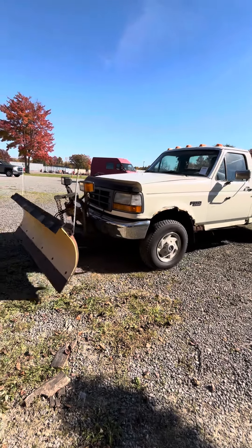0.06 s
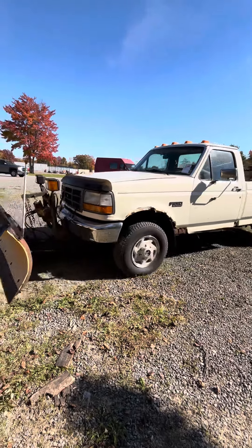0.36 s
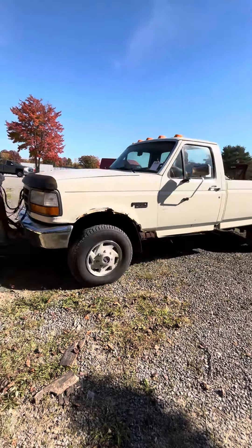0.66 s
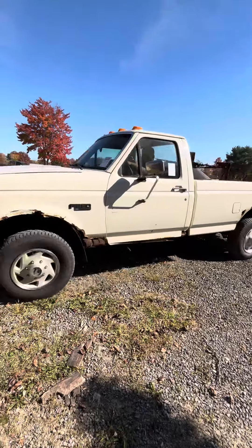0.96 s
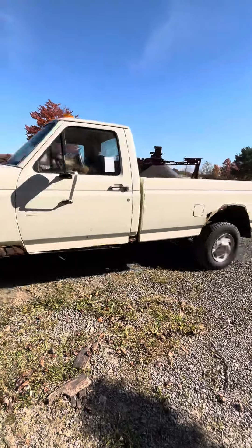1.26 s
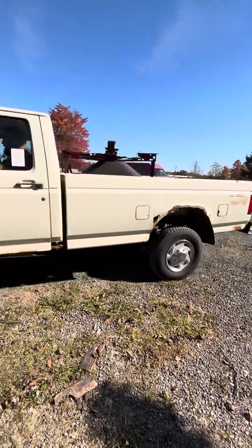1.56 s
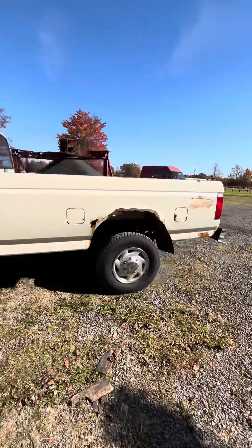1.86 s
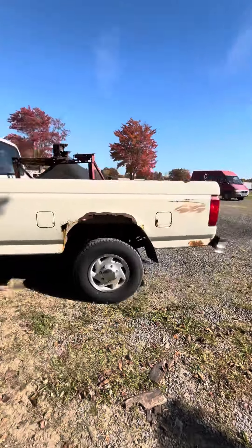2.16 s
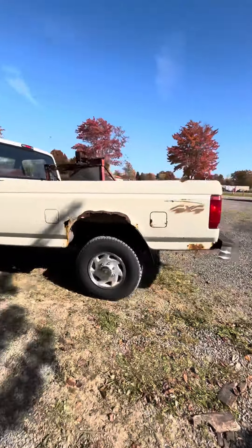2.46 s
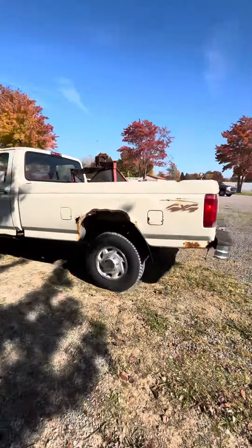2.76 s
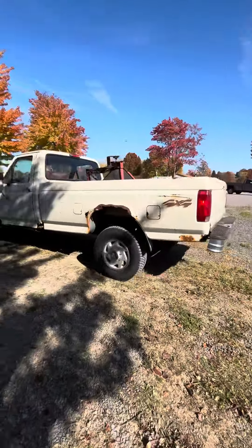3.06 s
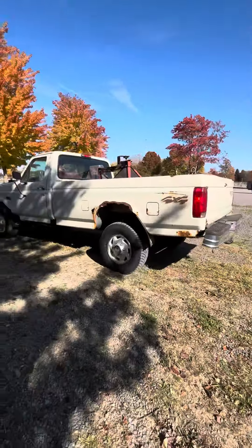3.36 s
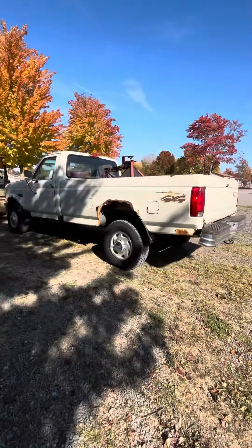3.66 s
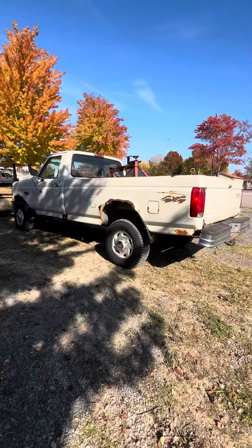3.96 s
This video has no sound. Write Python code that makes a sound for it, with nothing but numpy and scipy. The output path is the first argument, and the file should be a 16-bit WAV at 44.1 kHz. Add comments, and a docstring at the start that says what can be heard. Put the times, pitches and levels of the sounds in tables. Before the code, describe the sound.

A pickup engine revs briefly, booming with metallic clatter, then drops to a rough, burbling idle with a regular sharp tick and light rattles. It is heard outdoors on a phone carried from nose to tail.

```python
"""Outdoors, a V8 pickup is briefly revved and sinks back to idle, heard by a phone carried from nose to tail.
Each cylinder bank fires unevenly, so the pulses hold harmonics of the engine cycle: they boom under
throttle, while impacts and gritty bursts ring the metal of the engine bay. Once the throttle shuts,
the exhaust burbles, gas slugs chug at the tailpipe's resonances, and a sharp puff, like a leaking
manifold, ticks once in every cycle. Fan and belts whirr behind it, and loose parts rattle."""
import sys
import numpy as np
from scipy import signal
from scipy.fft import rfft, irfft
from scipy.io import wavfile

SR = 44100
rng = np.random.default_rng(int(sys.argv[2]) if len(sys.argv) > 2 else 0)


def transcribe(u):
    """Save the signal u as a 16-bit wav file named by the first command-line argument.

    u: samples, shape (n,) or (channels, n), limited to [-1, 1]; the rate is SR.
    q: integer samples, one column per channel.
    """
    v = np.clip(np.atleast_2d(u).T, -1, 1)
    q = np.round(v * 32767).astype(np.int16)
    wavfile.write(sys.argv[1], SR, q)


N = 176400
PADDED = 180000  # FFT length [samples]
CYCLE_TURNS, CYLINDERS = 2, 8  # crank turns and firings in one engine cycle

# levels of the rough layers (time [s], rumble [dB], clatter [dB], leak [dB], whirr [dB])
ROUGH_LEVELS = [(0, -22.5, -29, -60, -25), (.45, -20.5, -26.5, -62, -22), (.9, -18.5, -30, -49, -24.5),
                (1.08, -23, -45, -62, -26.5), (1.3, -24, -66, -53, -33), (1.7, -30, -53, -58, -33),
                (2.3, -28, -54.5, -56, -35.5), (2.9, -32.5, -50.5, -50, -38), (3.5, -35, -53.5, -46, -40.5),
                (4, -33, -60, -51.5, -41.5)]
# modes of the engine's metal parts (frequency [Hz], bandwidth [Hz], relative level [dB])
METAL_MODES = [(635, 66, 9), (871, 13, 3), (1947, 15.3, 3), (2150, 87, 0.5), (2628, 60, 6),
               (3028, 14, -1.5), (3190, 91, 0.5), (3660, 28, -1.5), (4240, 57, -4), (5047, 27, 0)]


def boom(cycle):
    """Periodic excitation: under throttle, uneven firing pulses sound harmonics of the cycle rate."""
    # spectrum (order [multiple of the cycle rate], relative level [dB])
    orders = [(2, -37.5), (3, -37), (4, -34.5), (5, -11.5), (6, -45), (7, -33.5), (8, -12.5), (9, -25.5),
              (10, -42), (11, -23), (12, -38), (13, -27.5), (16, -19.5), (17, -37), (19, -31), (21, -40),
              (22, -30), (23, -39), (24, -33.5), (29, -32.5)]
    # envelope (time [s], gain [dB])
    gain = [(0, 1), (.3, 0.5), (.65, 2), (.9, 1.5), (1.02, -2.5), (1.15, -3.5), (1.27, -10), (1.5, -67),
            (4, -71)]
    return -harmonics(cycle, orders, waver=0.021) * undb(curve(gain))


def burble(cycle):
    """Random modulation: with the throttle shut, wavering harmonics surround the firing note."""
    # spectrum without the firing note (order [multiple of the cycle rate], relative level [dB])
    orders = [(5, -42.5), (7, -37), (9, -31.5), (11, -29.5), (13, -31.5), (18, -42.5), (19, -33.5),
              (21, -42), (23, -42), (24, -37), (27, -41), (29, -38.5), (32, -39.5), (35, -43), (38, -44),
              (40, -45.5)]
    # envelopes (time [s], burble gain [dB], firing note level [dB])
    levels = [(0, -33, -41), (1, -7, -38), (1.28, 0.5, -27), (1.5, 3, -24.5), (2, -0.5, -22.5),
              (2.6, -0.5, -30.5), (3.1, 0.5, -35), (3.6, -1, -54), (4, -5.5, -58)]
    lumps = harmonics(cycle, orders, waver=0.09, smear_rad=.95) * undb(curve(levels))
    note = harmonics(cycle, [(CYLINDERS, 0)], waver=0.083) * undb(curve(levels, column=2))
    return lumps + note


def rumble(cycle):
    """Flow noise: rough exhaust gas swells at each firing and excites the tailpipe's hollow resonance."""
    # gas spectrum (frequency [Hz], relative density [dB])
    spectrum = [(20, -41), (45, -7), (75, -3), (150, 0.5), (220, -6.5), (310, -7), (450, -16.5), (700, -32),
                (2000, -59)]
    # envelope of the resonance (time [s], level [dB])
    pipe_level = [(0, -31), (.5, -28.5), (.65, -29.5), (.77, -24.5), (1, -37), (1.4, -34.5), (2.2, -37),
                  (3, -53), (3.6, -51), (4, -46)]
    pipe_hz, width_hz = 279.4, 84
    gas = colour(noise() * throb(cycle, depth=0.55), spectrum)
    flow = noise() * throb(cycle, depth=0.46)
    hollow = unit(ring(ring(flow, pipe_hz, width_hz), pipe_hz, width_hz))
    return gas * undb(curve(ROUGH_LEVELS)) + hollow * undb(curve(pipe_level))


def drone(cycle):
    """The second harmonic of the firing rate: a smooth tone an octave above the firing note."""
    # envelope (time [s], level [dB])
    level = [(0, -45), (1.1, -28.5), (1.3, -23.5), (1.55, -21), (1.8, -23), (2.1, -24.5), (2.6, -24.5),
             (3.1, -25), (3.6, -25), (4, -28.5)]
    return harmonics(cycle, [(2 * CYLINDERS, 0)], waver=0.046) * undb(curve(level))


def chugs(cycle):
    """Impulse response of a pipe: slugs of gas ring the tailpipe's modes in rounded chugs."""
    # gas slugs, in two groups a cycle (place [cycles], relative level [dB])
    slugs = [(.13, -11), (0.299, -7), (.36, -1), (.66, -1.5), (0.761, 1.5)]
    # pipe modes (frequency [Hz], bandwidth [Hz], relative level [dB])
    modes = [(204, 50, 0.5), (275.3, 42, 0.5)]
    # envelope (time [s], level [dB])
    level = [(0, -51), (1.1, -31), (1.5, -36), (2.6, -32), (3.2, -34), (3.65, -33.5), (4, -36)]
    push = pulses(cycle, slugs, scatter_db=0.5)
    pipe = sum(undb(db) * ring(ring(push, hz, width), hz, hz / 2) for hz, width, db in modes)
    return unit(pipe) * undb(curve(level))


def clatter(cycle):
    """Forced vibration: gritty noise bursts in the engine bay drive the modes of its metal parts."""
    # bursts in each cycle (place [cycles], relative level [dB], decay [cycles])
    pattern = [(.09, 1.5, 0.32), (.335, -3, 0.72), (.485, 0.5, 0.12), (.745, -4.5, 0.13)]
    # burst spectrum (frequency [Hz], relative density [dB])
    spectrum = [(150, -4), (400, -8), (800, -3.5), (1500, 0.5), (2500, -0.5), (4300, -6), (5800, -5.5),
                (8000, -10), (10500, -23), (14000, -19), (16000, -33)]
    grit_per_s, grit_db, metal_db = 2500, -6.5, -18
    grit = unit(np.sign(noise()) * (rng.random(N) < grit_per_s / SR))
    drive = (noise(channels=3) + undb(grit_db) * grit) * bursts(cycle, pattern, rise_cycles=0.054)
    metal = unit(sum(undb(db) * ring(drive, hz, width) for hz, width, db in METAL_MODES))
    return unit(colour(drive, spectrum) + undb(metal_db) * metal) * undb(curve(ROUGH_LEVELS, column=2))


def valve_taps(cycle):
    """Free vibration after impact: each valve gear blow cracks and rings its own mix of metal modes."""
    # blows in each cycle (place [cycles], relative level [dB])
    pattern = [(.1, -1), (.14, 2.5), (.23, -2.5), (.355, -1.5), (.43, 2), (.51, -0.5), (.58, -3),
               (0.759, -6)]
    # tone shaping (frequency [Hz], relative gain [dB])
    spectrum = [(200, -3), (600, 0), (2000, -1.5), (3200, 2), (4500, 4.5), (8000, 4), (10500, -9.5),
                (14000, -6), (16000, -20)]
    # envelope (time [s], level [dB])
    level = [(0, -29), (.45, -24.5), (.9, -29.5), (1.08, -44), (1.3, -49.5), (1.75, -46.5), (2.3, -54),
             (4, -58)]
    mode_scatter_db, detune_share, crack_db, crack_decay_s = 8.5, .012, 0.5, 0.0044
    blows = pulses(cycle, pattern, scatter_db=3.5)
    age = np.arange(SR // 16) / SR
    hz, width, db = np.array(METAL_MODES).T[:, :, None]
    decay = np.sqrt(width / width.sum()) * np.exp(-np.pi * width * age)  # broad modes die sooner
    out = np.zeros((3, N + len(age)))
    for at in np.flatnonzero(blows):
        size, detune, phase = rng.standard_normal(size=(3, 3, len(METAL_MODES), 1))
        strength = undb(db + mode_scatter_db * np.clip(size, -1, 1))
        pitch = hz * (1 + detune_share * detune)
        rings = (strength * decay * np.sin(2 * np.pi * (pitch * age + phase))).sum(axis=1)
        crack = undb(crack_db) * rng.standard_normal(size=(3, len(age))) * np.exp(-age / crack_decay_s)
        out[:, at:at + len(age)] += blows[at] * (rings + crack)
    return colour(out, spectrum) * undb(curve(level))


def clacks():
    """Damped resonance: shaken parts in the engine bay clack, each with its own short ring."""
    # metallic clacks (time [s], pitch [Hz], level [dB])
    hits = [(0.032, 1210, -18), (0.185, 1720, -17.5), (.213, 2180, -22.5), (0.262, 3060, -22),
            (.274, 4740, -31), (.438, 4170, -16), (.449, 4770, -31), (0.602, 2170, -17),
            (0.774, 4530, -21.5), (0.87, 2100, -21), (0.899, 4400, -23), (0.947, 1650, -22.5),
            (1.03, 4500, -39)]
    return sum(undb(db) * strike(s, decay_s=0.013) * unit(ring(noise(), hz, width_hz=280))
               for s, hz, db in hits)


def leak(cycle):
    """Jet noise: escaping gas puffs weakly throughout and, towards idle, ticks sharply once a cycle."""
    # weak puffs in each cycle (place [cycles], relative level [dB], decay [cycles])
    puffs = [(.18, -1, .092), (.58, -3, .14), (.85, -4, .05)]
    # their spectrum (frequency [Hz], relative density [dB])
    puff_spectrum = [(200, -20), (600, -1.5), (1200, 17), (2000, 10.5), (3000, 6.5), (4300, -5),
                     (5800, -7.5), (8000, -24), (10500, -42), (15000, -29)]
    # sharp ticks (time [s], hiss level [dB], clack level [dB], clack pitch [Hz])
    ticks = [(1.348, -40, -35, 2000), (1.457, -44, -40, 2080), (1.568, -39.5, -32.5, 1680),
             (1.684, -36.5, -44, 3000), (1.798, -37.5, -36, 1900), (1.913, -44, -36, 1800),
             (2.031, -39, -36, 1500), (2.149, -40, -35, 1900), (2.268, -37, -31, 1200),
             (2.388, -35.5, -39, 1500), (2.511, -36, -33, 1280), (2.639, -36.5, -51, 1200),
             (2.765, -39.5, -36, 1400), (2.896, -39.5, -30.5, 1700), (3.031, -38.5, -39, 1510),
             (3.165, -43.5, -38, 2120), (3.299, -39, -33.5, 2020), (3.433, -41, -34.5, 1730),
             (3.57, -39.5, -32, 1860), (3.709, -43, -37.5, 1110), (3.847, -43.5, -35.5, 2200),
             (3.987, -47, -36.5, 1900)]
    # spectrum of their hiss (frequency [Hz], relative density [dB])
    hiss_spectrum = [(500, -14), (2000, -1), (3000, -0.5), (4300, 1.5), (5800, 4), (8000, -2),
                     (10500, -18.5), (15000, -13.5)]
    rise_s, decay_s, width_hz = 0.0022, 0.012, 1160
    t = np.arange(N) / SR
    gas = noise(channels=3)
    hiss = colour(noise(channels=3), hiss_spectrum)
    puffing = noise(channels=3) * bursts(cycle, puffs, rise_cycles=0.022)
    out = colour(puffing, puff_spectrum) * undb(curve(ROUGH_LEVELS, column=3))
    for s, hiss_db, clack_db, hz in ticks:
        near = slice(int(s * SR), int(s * SR) + SR // 10)
        shape = swell(np.maximum(t[near] - s, 0), rise_s, decay_s)
        clack = unit(ring(ring(gas[:, near], hz, width_hz), hz, 2 * width_hz))
        out[:, near] += shape * (undb(hiss_db) * hiss[:, near] + undb(clack_db) * clack)
    return out


def whirr(cycle):
    """Broadband noise of fan, belts and valve gear, fluttering and pulsing faintly with the firings."""
    # spectrum (frequency [Hz], relative density [dB])
    spectrum = [(100, -8), (350, -0.5), (550, 1), (900, -1.5), (1600, -8), (2500, -13.5), (4300, -21.5),
                (5800, -23.5), (8000, -28), (10500, -39), (15000, -35.5)]
    drive = noise(channels=3) * throb(cycle, depth=0.033) * undb(1.06 * drift(knots_per_s=90))
    return colour(drive, spectrum) * undb(curve(ROUGH_LEVELS, column=4))


def rasp(cycle, hz=4440, width_hz=1130):
    """Band-limited noise, modulated at the firing rate: a thin bright rasp beside the valve taps."""
    # envelope (time [s], level [dB])
    level = [(0, -41), (.45, -43), (.9, -34), (1.08, -43.5), (1.3, -54), (1.75, -53.5), (2.3, -63),
             (4, -67)]
    drive = noise(channels=3) * throb(cycle, depth=0.23)
    return unit(ring(ring(drive, hz, width_hz), hz, width_hz)) * undb(curve(level))


def knocks():
    """Heavy damping: three modes die within milliseconds, so each knock sounds dull."""
    # knocks (time [s], level [dB])
    hits = [(1.671, -15), (2.512, -40), (2.897, -29.5), (3.573, -28)]
    # their modes (frequency [Hz], relative level [dB])
    modes = [(660, 1.5), (830, -8.5), (1040, -5)]
    t = np.arange(N) / SR
    return sum(undb(db + mode_db) * strike(s, decay_s=.003) * np.sin(2 * np.pi * hz * (t - s))
               for s, db in hits for hz, mode_db in modes)


def rattles():
    """Light impacts: loose parts each give a fast-decaying band of noise."""
    # rattles (time [s], pitch [Hz], bandwidth [Hz], level [dB])
    hits = [(1.96, 2130, 303, -44), (2.044, 1080, 597, -32), (2.346, 2150, 200, -31),
            (2.466, 2110, 200, -38.5), (2.59, 2130, 199, -35), (2.639, 2150, 200, -30.5),
            (2.72, 2100, 198, -35), (2.881, 1700, 2000, -35), (2.98, 1400, 594, -38),
            (3.113, 1780, 3470, -36), (3.386, 2300, 600, -38), (3.52, 2100, 500, -35),
            (3.659, 2060, 500, -34), (3.799, 1930, 496, -38), (3.938, 2400, 900, -42)]
    return sum(undb(db) * strike(s, decay_s=0.0042) * unit(ring(noise(), hz, width))
               for s, hz, width, db in hits)


def harmonics(cycle, orders, waver, smear_rad=.45):
    """Fourier series of one bank's uneven pulses; pipes smear the phases and high orders waver more."""
    # firings of the nearer cylinder bank (slot [eighths of a cycle])
    bank_slots = [0, 2, 3, 5]
    out = 0
    for order, db in orders:
        bank = np.exp(-2j * np.pi * order * np.array(bank_slots) / CYLINDERS).sum()
        phase = 2 * np.pi * order * cycle + np.angle(bank) + smear_rad * rng.standard_normal()
        spread = waver * order / CYLINDERS
        amplitude = undb(db) * (1 + spread * drift(knots_per_s=12))
        out = out + amplitude * np.cos(phase + spread * drift(knots_per_s=12))
    return out


def bursts(cycle, table, rise_cycles):
    """Envelope of bursts that return in every cycle, vary a little in strength and add in power."""
    power = 0
    for place, db, decay in table:
        since = cycle - place + 1
        size = undb(db - 0.5 * rng.standard_normal(size=64))[since.astype(int)]
        power = power + (size * swell(since % 1, rise_cycles, decay)) ** 2
    return unit(np.sqrt(power))


def pulses(cycle, table, scatter_db):
    """Impulse train: pushes at set places of every cycle, each of its own strength."""
    out = np.zeros(N)
    for place, db in table:
        at = np.flatnonzero(np.diff(np.floor(cycle - place)))
        out[at] += undb(db + scatter_db * rng.standard_normal(size=64))[:len(at)]
    return out


def throb(cycle, depth):
    """Amplitude modulation at the firing rate."""
    return unit(1 + depth * np.cos(2 * np.pi * CYLINDERS * cycle))


def swell(age, rise, decay):
    """Linear rise, then exponential decay."""
    return np.minimum(age / rise, 1) * np.exp(-np.maximum(age - rise, 0) / decay)


def strike(start_s, decay_s):
    """Sudden onset, then exponential decay."""
    age = np.arange(N) / SR - start_s
    return (age >= 0) * np.exp(-np.maximum(age, 0) / decay_s)


def ring(x, hz, width_hz):
    """Second-order resonator."""
    return signal.lfilter(*signal.iirpeak(hz, hz / width_hz, fs=SR), x)


def colour(x, table):
    """Spectral shaping, scaled to rms 1."""
    return unit(irfft(rfft(x, PADDED) * undb(response(table)), PADDED)[..., :N])


def noise(channels=1):
    """White noise, uncorrelated between rows."""
    return rng.standard_normal((channels, N))


def drift(knots_per_s):
    """Random fluctuation: Gaussian values joined by straight lines."""
    knots = rng.standard_normal(1024)
    return 1.67 * np.interp(np.arange(N) / SR * knots_per_s, np.arange(len(knots)), knots)


def curve(table, column=1):
    """One column of a time table, interpolated linearly."""
    rows = np.array(table, float)
    return np.interp(np.arange(N) / SR, rows[:, 0], rows[:, column])


def response(table, column=1):
    """One column of a frequency table, interpolated over log frequency."""
    rows = np.array(table, float)
    hz = np.maximum(np.fft.rfftfreq(PADDED, 1 / SR), 1)
    return np.interp(np.log(hz), np.log(rows[:, 0]), rows[:, column])


def undb(db):
    """Decibels to amplitude ratio."""
    return 10 ** (np.asarray(db) / 20)


def unit(x):
    """Scale to rms 1."""
    return x / np.sqrt(np.mean(x ** 2))


def scene():
    """Partial coherence: left and right share the direct sound; body and ground scatter the noisy parts."""
    # crankshaft speed (time [s], speed [rpm])
    speed = [(0.0, 1368.7), (0.25, 1478.5), (0.5, 1576.3), (0.7, 1593.3), (0.92, 1605.6), (1.03, 1508.5),
             (1.2, 1249.0), (1.32, 1136.2), (1.55, 1060.1), (1.85, 1034.1), (2.25, 1008.0), (2.6, 946.0),
             (2.95, 905.5), (3.4, 882.9), (4.0, 849.3)]
    # stereo image (frequency [Hz], left minus right [dB], left phase lead [rad], coherence [0-1])
    stereo_image = [(60, 0.3, 0.21, 0.7), (198, -1, 0.08, .995), (380, 2, -1, 0.73),
                    (567, -7.5, -1.87, 0.97), (1400, -5, 0.5, 0.5), (2350, -0.5, 2, 0.81),
                    (3870, -5.5, 2.5, 0.26), (5480, -1, 3, 0.67), (7830, -0.5, 5.5, 0.45),
                    (8570, 4.5, 7, 1), (9300, -7, 6, 1), (11900, 2.5, 10.5, 1), (12700, -2, 15, .9),
                    (14000, 0, 13, .9), (15400, 3, 10, .9)]
    cycle = np.cumsum(curve(speed)) / SR / 60 / CYCLE_TURNS  # engine cycles elapsed
    boom_cycle, pipe_cycle = cycle - .66, cycle - .35  # counted from the nearer bank's first pulse
    engine_bay = clatter(cycle) + valve_taps(cycle) + rasp(cycle) + leak(cycle) + whirr(cycle)
    exhaust = boom(boom_cycle) + burble(pipe_cycle) + rumble(pipe_cycle) + drone(pipe_cycle)
    coherent = exhaust + chugs(cycle) + clacks() + knocks() + rattles()
    shared, left, right = rfft(engine_bay, PADDED)
    coherence = np.clip(response(stereo_image, column=3), 0, 1)
    direct = rfft(coherent, PADDED)[0] + np.sqrt(coherence) * shared
    scatter = np.sqrt(1 - coherence)
    balance = undb(response(stereo_image))
    lead = np.exp(1j * response(stereo_image, column=2))
    stereo = np.array([(direct + scatter * left) * balance * lead, direct + scatter * right])
    return irfft(stereo * np.sqrt(2 / (1 + balance ** 2)), PADDED)[:, :N]


def record(dry, top_hz=15400):
    """Clipping and band limiting: the phone clips peaks at full scale, then cuts the highest treble."""
    low_pass = signal.ellip(8, .2, 70, top_hz, fs=SR, output="sos")
    return signal.sosfilt(low_pass, np.clip(dry, -1, 1))


dry = scene()
out = record(dry)
transcribe(out)
```